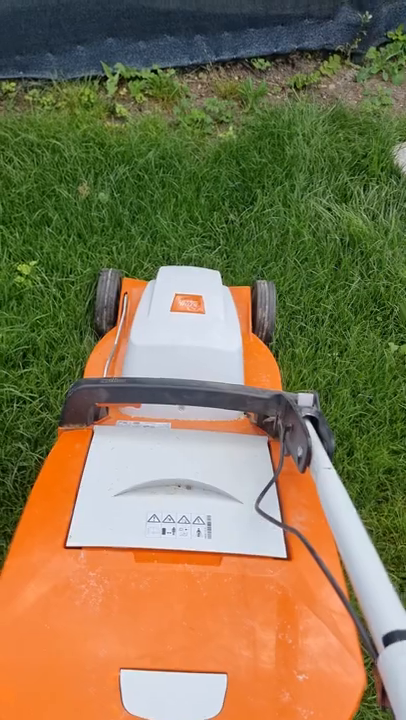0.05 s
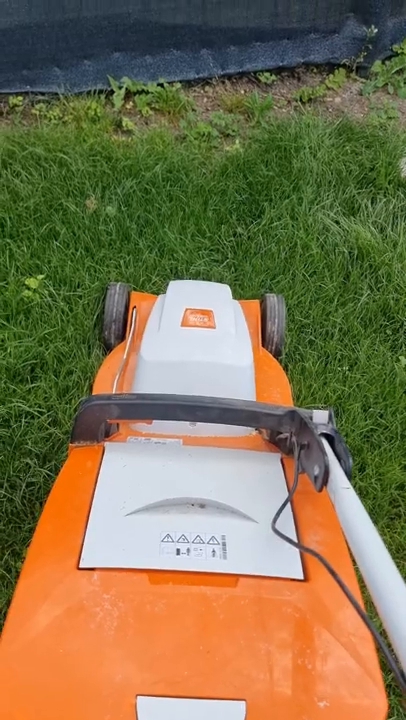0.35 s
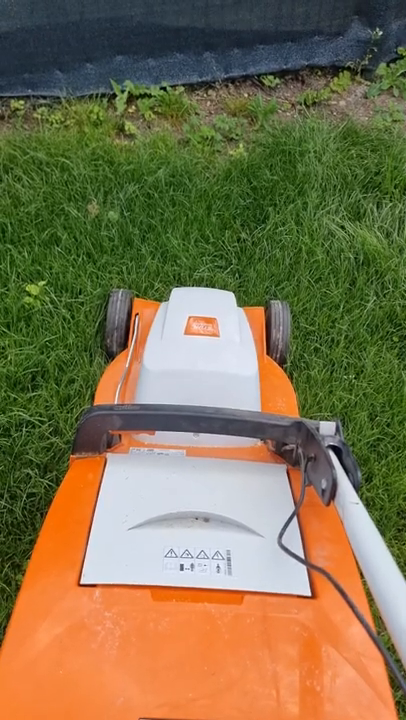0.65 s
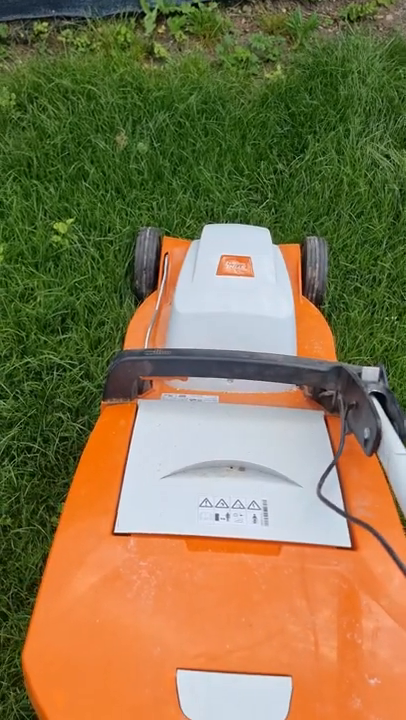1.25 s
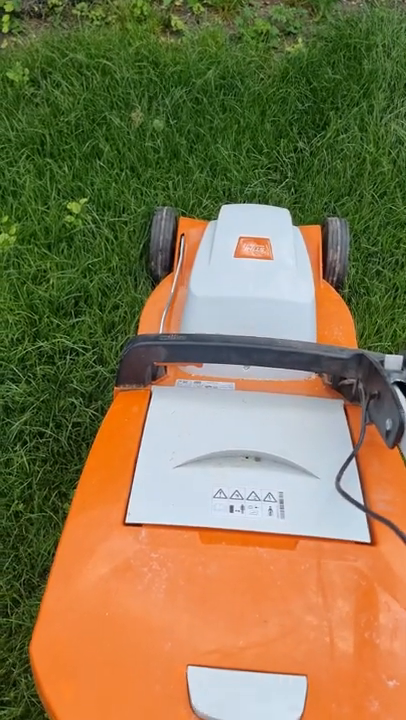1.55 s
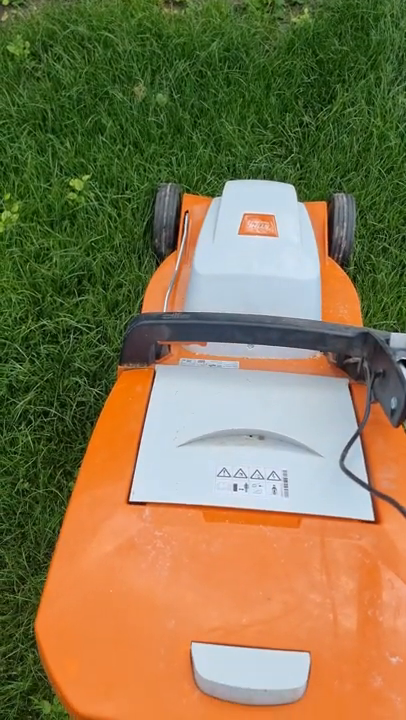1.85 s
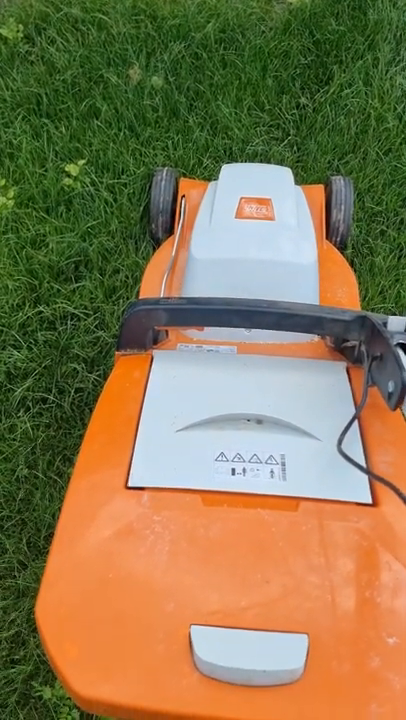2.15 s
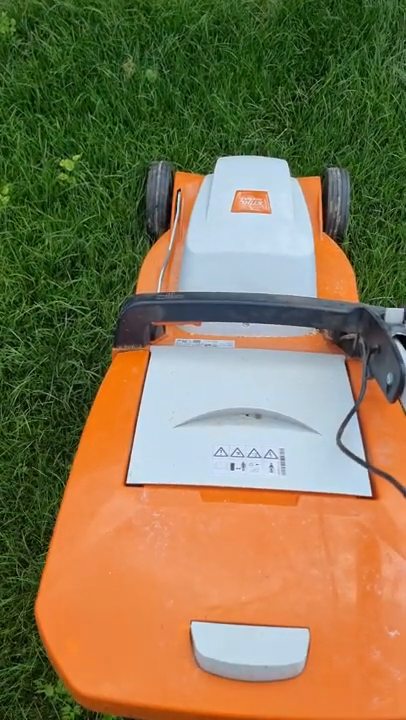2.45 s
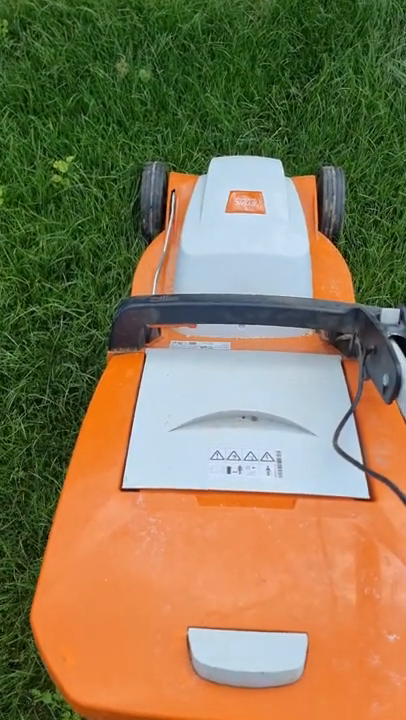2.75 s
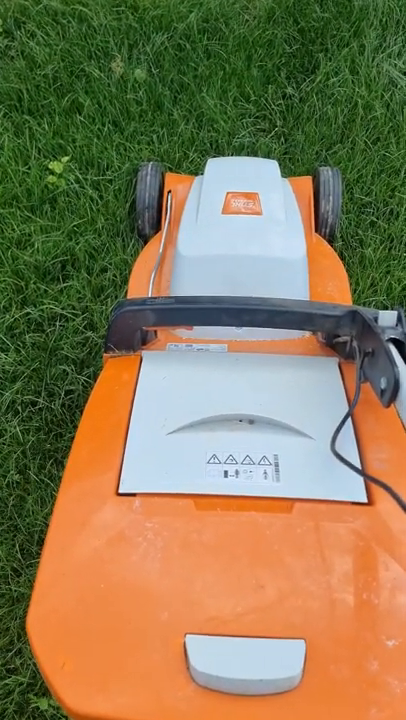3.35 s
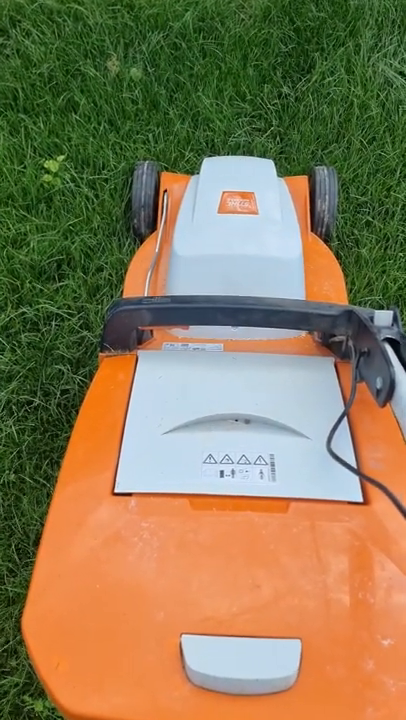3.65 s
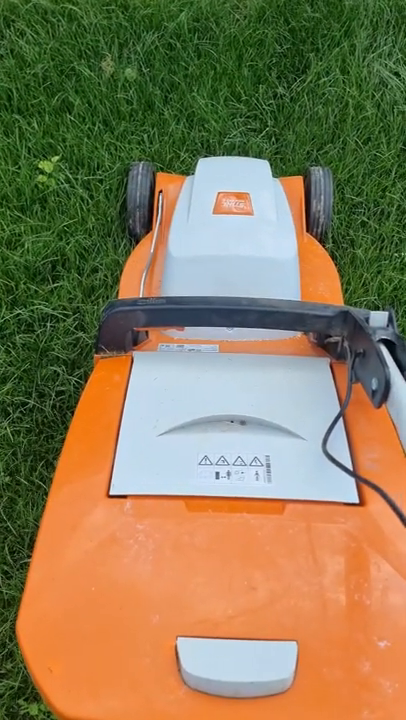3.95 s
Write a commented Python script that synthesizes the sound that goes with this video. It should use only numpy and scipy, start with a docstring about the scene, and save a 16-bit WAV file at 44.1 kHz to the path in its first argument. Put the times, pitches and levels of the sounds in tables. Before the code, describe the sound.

Heard from the handle outdoors, an electric lawn mower is switched on with a soft clack and a sharp snap. The motor jolts, clatters and rises in pitch, settling into a steady whirring hum with a fast rattle.

```python
"""An electric lawn mower is switched on, heard from its handle on a quiet lawn.
Hands rustle on the handle, a button clacks and the switch snaps. The motor jolts the plastic deck
(the shell over the blade) and clatters up to speed. Then the blade hums and churns the air,
the drive knocks and rattles in every turn, and the motor adds thin whistles."""
import sys
import numpy as np
from scipy import signal
from scipy.fft import rfft, irfft
from scipy.io import wavfile
from scipy.ndimage import uniform_filter1d, minimum_filter1d

SR = 44100
rng = np.random.default_rng(int(sys.argv[2]) if len(sys.argv) > 2 else 0)


def wav_record(signal):
    """Record a signal, one row per channel, as 16-bit PCM in the file named by sys.argv[1]."""
    frames = np.transpose(np.atleast_2d(signal))
    bounded = np.clip(frames, -1, 1)
    # unit amplitude maps onto the largest positive 16-bit level
    quanta = np.round(bounded * 32767).astype(np.int16)
    wavfile.write(sys.argv[1], SR, quanta)


N = 176400
T = np.arange(N) / SR

# How fast the motor shaft spins: time_s, turns_per_s
SHAFT_SPEED = [(1.211, 16.37), (1.28, 18.43), (1.37, 28.0), (1.5, 34.17), (1.62, 38.95), (1.75, 40.72),
               (1.87, 42.13), (2.0, 43.76), (2.25, 45.64), (2.6, 46.97), (3.05, 48.0), (3.5, 48.52),
               (4.0, 48.86)]
# How strongly the air in the deck rings at each pitch: pitch_hz, level_db
DECK_TONE = [(20, -25), (60, -17.5), (110, -18), (180, -4), (230, -8.5), (300, 1), (360, -1.5), (450, -10),
             (680, -9.5), (850, -9), (1300, -13), (2000, -19), (4000, -70.5)]


def amp(db):
    """Turns decibels into a gain."""
    return 10 ** (np.asarray(db) / 20)


def unit(x):
    """Scales a signal to an average strength (rms) of 1."""
    return x / np.sqrt(np.mean(x ** 2) + 1e-20)


def read(points, hz):
    """Looks up a pitch in a table, on a scale of octaves."""
    pitches, values = np.transpose(points)
    return np.interp(np.log(hz + 1), np.log(pitches + 1), values)


def level(points):
    """Turns a loudness curve into a gain, silent before it begins."""
    times, db = np.transpose(points)
    return amp(np.interp(T, times, db)) * (T >= times[0])


def add(mix, start_s, sound):
    """Mixes a stereo sound in at its start time."""
    part = mix[:, round(start_s * SR):][:, :sound.shape[1]]
    part += sound[:, :part.shape[1]]


def drift(hz):
    """A random wobble of strength 1, up to about the given rate."""
    keep_slow = 1 / (1 + (np.fft.rfftfreq(N, 1 / SR) / hz) ** 4)
    return unit(irfft(rfft(rng.standard_normal(N)) * keep_slow, N))


def colour(x, tone, size=4096):
    """Gives a sound a tone, with a filter that rings only after each hit."""
    log_gain = np.log(unit(amp(read(tone, abs(np.fft.fftfreq(size, 1 / SR))))))
    taps = np.fft.ifft(np.exp(np.conj(signal.hilbert(log_gain)))).real
    return signal.oaconvolve(x, taps[None, :size // 2], axes=1)[:, :x.shape[1]]


def noise(size):
    """White noise at two microphones, alike in the bass."""
    # How alike left and right are: pitch_hz, likeness (1 = the same)
    likeness = [(30, .92), (100, 1), (380, .98), (500, .65), (1050, .88), (2000, .5), (9000, 0)]
    left, other = np.exp(2j * np.pi * rng.random((2, size // 2 + 1)))
    same = np.clip(read(likeness, np.fft.rfftfreq(size, 1 / SR)), -1, 1)
    right = same * left + np.sqrt(1 - same ** 2) * other
    return unit(irfft(np.array([left, right]), size))


def decay(t, ring_s):
    """A fade that falls 60 dB in ring_s."""
    return np.exp(-np.log(1000) * t / ring_s)


def rubs(rows, tone, grain_db=2.0):
    """Soft, grainy rubbing that swells and fades with each stroke."""
    strokes = sum(amp(db) * np.sqrt(abs(np.sin(np.pi * np.clip((T - start_s) / length_s, 0, 1))))
                  for start_s, length_s, db in rows)
    grains = noise(N) * amp(grain_db * drift(hz=60))
    return unit(colour(grains, tone)) * strokes


def hits(rows, tone, size=8192):
    """Blows on plastic: quickly dying bursts of noise that share one tone."""
    out = np.zeros((2, N))
    for start_s, db, ring_s in rows:
        add(out, start_s, amp(db) * decay(T[:size], ring_s) * noise(size))
    return colour(out, tone)


def outdoor_air(start_s=0.068, level_db=-55):
    """Faint outdoor air that wavers a little."""
    # Tone of the air: pitch_hz, level_db
    tone = [(20, -14), (64, -3), (139, -11.5), (230, -12), (555, -21.5), (800, -11.5), (1590, -26.5),
            (3500, -34.5), (6720, -41), (8400, -56), (15000, -54)]
    return amp(level_db + drift(hz=6)) * unit(colour(noise(N), tone)) * (T > start_s)


def hands_and_sleeves():
    """A hand slides along the handle, and sleeves rustle."""
    # Strokes of hand and sleeves: start_s, length_s, level_db
    slides = [(.068, .55, -72.5)]
    rustles = [(.2, 0.37, -73), (.53, 0.26, -68.5), (.8, 0.45, -71)]
    # Their tones: pitch_hz, level_db
    slide_tone = [(2200, -16), (2850, 2), (3400, -18), (4400, -9), (6000, -30)]
    rustle_tone = [(2800, -20), (4800, 3), (7200, 2), (8400, -13), (14000, -6)]
    return rubs(slides, slide_tone) + rubs(rustles, rustle_tone)


def deck_jolts(rise_s=0.0038):
    """A nudge of the handle, then the twist of the starting motor, makes the deck boom."""
    # Jolts: start_s, level_db
    jolts = [(0.48, -50.5), (1.196, -30), (1.21, -15), (1.28, -19), (1.327, -14.5), (1.362, -16),
             (1.398, -14.5)]
    # The deck's own low notes: pitch_hz, level_db, ring_s
    notes = [(126, -16.5, 0.26), (200, 1.5, 0.078), (295.4, 4, 0.11), (311, 3, 0.1), (385.2, 2.5, 0.18),
             (537, -2.5, 0.08), (740, 8, 0.045)]
    out, t = np.zeros((2, N)), T[:SR // 2]
    ring = sum(amp(db) * decay(t, ring_s) * np.sin(2 * np.pi * hz * t) for hz, db, ring_s in notes)
    boom = np.minimum(t / rise_s, 1) * ring
    for start_s, db in jolts:
        add(out, start_s, np.tile(amp(db) * boom, (2, 1)))
    return out


def handle_clacks():
    """The handle and its button clack."""
    # Clacks: start_s, level_db, ring_s
    clacks = [(.576, -35, 0.11), (1.109, -44, 0.056)]
    # Their tone: pitch_hz, level_db
    tone = [(100, -9), (480, 5), (800, 12), (1300, 2), (1800, -4), (2400, -11), (3300, -30), (7000, -33),
            (10000, -42)]
    return hits(clacks, tone)


def switch_snap():
    """The switch closes with one bright snap."""
    # The snap: start_s, level_db, ring_s
    snap = (1.1832, -24, .04)
    # Its tone: pitch_hz, level_db
    tone = [(180, -48), (300, -10), (1440, -18), (1850, 1), (2480, -7), (3980, -10), (6100, -3.5),
            (7060, -5), (8190, -30), (11400, -21), (15000, -36)]
    return hits([snap], tone)


def starting_clatter():
    """The motor clatters heavily through its first turns."""
    # Clatters: start_s, level_db, ring_s
    clatters = [(1.19, -34.5, 0.33), (1.211, -16, 0.1), (1.268, -9.5, 0.071), (1.283, -10.5, 0.098),
                (1.318, -9.5, 0.16), (1.359, -13.5, 0.18), (1.394, -13.5, 0.1), (1.427, -16.5, 0.088),
                (1.458, -16, 0.034)]
    # Their tone: pitch_hz, level_db
    tone = [(150, -15), (350, -4), (800, 11), (1700, 0.5), (2800, -1), (3900, -5.5), (5000, -13.5),
            (6800, -24), (8500, -41), (16000, -28)]
    return hits(clatters, tone)


def even_ring(fade, passes=6):
    """A dense ring that follows the fade and favours no pitch."""
    ring = noise(len(fade))
    for _ in range(passes):
        ring = irfft(np.exp(1j * np.angle(rfft(ring * fade))))  # even across pitch
        ring = ring / np.sqrt(abs(uniform_filter1d(ring ** 2, size=24)) + 1e-18)  # even across time
    return unit(ring * fade)


def strikes(turns, rows, tone, loudness, rise_s=0.00091, jitter_s=1e-5, settle_s=0.22, size=2048):
    """Strikes ring the housing in every turn: loose and noisy at first, then nearly alike."""
    steady, energy = np.zeros((2, N)), np.zeros(N)
    running = turns > 0
    for place, db, ring_s in rows:
        due_turns = np.arange(int(turns[-1])) + place
        late_s = jitter_s * rng.standard_normal(len(due_turns))
        at_sample = (np.interp(due_turns, turns[running], T[running]) + late_s) * SR
        # Spread each pulse over its neighbours so it can land between samples.
        near = np.clip(at_sample.astype(int)[:, None] + np.arange(-8, 9), 0, N - 1)
        pulses = np.zeros(N)
        np.add.at(pulses, near, amp(db) * np.sinc(near - at_sample[:, None]))
        fade = unit(decay(T[:size], ring_s) * np.minimum(T[:size] / rise_s, 1))
        steady += signal.oaconvolve(pulses[None], even_ring(fade), axes=1)[:, :N]
        energy += signal.oaconvolve(pulses ** 2, fade ** 2)[:N]
    running_s = np.maximum(T - SHAFT_SPEED[0][0], 0)
    looseness = np.clip(0.033 + np.exp(-running_s / settle_s), 0, 1)
    blend = np.sqrt(1 - looseness ** 2) * steady + looseness * np.sqrt(abs(energy)) * noise(N)
    return unit(colour(blend, tone)) * np.sqrt(running.mean()) * level(loudness)


def drive(turns):
    """A crisp knock in every turn, a rattle after it, and chatter loudest as the motor pulls hardest."""
    # Strikes within one turn: place_turns, level_db, ring_s
    knocks = [(-.04, -8, 0.015), (-0.005, -9, 0.016)]
    rattles = [(0.169, -0.96, 0.02), (0.301, -0.5, 0.0259), (0.499, -1.5, .04)]
    chatter = [(-.025, -1.5, 0.0236), (0.059, -4, 0.031), (0.499, -6, .035)]
    # Tones of the struck housing: pitch_hz, level_db
    knock_tone = [(300, -43), (700, -12), (1100, -2.5), (1750, -10.5), (2100, 5.5), (2550, 0), (2950, -7.5),
                  (3200, 5.5), (3450, 5), (3650, -18), (4300, -2), (5000, -22), (6800, -13), (8000, -31),
                  (16000, -40)]
    rattle_tone = [(250, -19), (500, 5), (800, 0.5), (1100, -1), (1350, 0), (1800, 2.5), (2050, 1),
                   (2300, 3.5), (2600, -7), (3000, -15.5), (3300, 1.5), (3700, -5.5), (5000, -10.5),
                   (6700, -10), (8200, -27.5), (16000, -27)]
    chatter_tone = [(400, -18), (900, 0.5), (1400, -4.5), (1900, -38.5), (2250, 6.5), (2500, -15),
                    (2800, 7.5), (3100, -12.5), (3750, -6.5), (4200, -17.5), (7000, -21.5), (9000, -53.5)]
    # Loudness curves: time_s, level_db
    knock_loudness = [(1.21, -38), (1.27, -27), (1.47, -36), (1.801, -25), (2.2, -28.5), (2.7, -26.5),
                      (3.2, -24), (4.0, -24)]
    rattle_loudness = [(1.3, -23), (1.6, -24.5), (2.0, -23.5), (2.6, -23), (3.2, -22.5), (4.0, -24)]
    chatter_loudness = [(1.35, -26), (1.55, -18.5), (1.85, -18), (2.15, -23.5), (2.501, -26.5), (3.0, -28)]
    return (strikes(turns, knocks, knock_tone, knock_loudness)
            + strikes(turns, rattles, rattle_tone, rattle_loudness)
            + strikes(turns, chatter, chatter_tone, chatter_loudness))


def blade_air(turns, roar_depth=0.33, hiss_depth=0.037, waver_db=1.06):
    """Air churned in the deck throbs with each blade end; the hiss of the tips throbs once a turn."""
    # Loudness curves: time_s, level_db
    roar_loudness = [(1.22, -23), (1.28, -21), (1.38, -15), (1.47, -16), (1.75, -18), (2.2, -19),
                     (2.7, -19), (3.2, -21), (4.0, -22.5)]
    hiss_loudness = [(1.22, -38.5), (1.29, -32.5), (1.38, -28), (1.48, -30.5), (1.85, -30.5), (2.2, -27.5),
                     (3.0, -28.5), (4.0, -31)]
    # Tone of the blade tips: pitch_hz, level_db
    hiss_tone = [(300, -2), (1000, -4.5), (1800, -11), (2500, 5.5), (3600, 2), (4600, -1.5), (6800, -2),
                 (8000, -13), (11000, -16), (13000, -12), (16000, -22)]
    roar = colour(noise(N) * (1 + roar_depth * np.cos(4 * np.pi * turns)), DECK_TONE)
    hiss = colour(noise(N) * (1 + hiss_depth * np.cos(2 * np.pi * (turns - .2))), hiss_tone)
    waver = amp(waver_db * drift(hz=6.5))
    return unit(roar) * level(roar_loudness) + unit(hiss) * level(hiss_loudness) * waver


def blade_hum(speed, turns, lag_turns=0.0566, scatter=0.2423, roughness=0.005):
    """Tones at multiples of the shaft speed; the upper ones swell where the deck rings."""
    # Tones of the hum: multiple, level_db
    tones = [(1, -27), (2, 0.5), (3, -10.5), (4, 0.5), (5, -17), (6, -7), (7, -10), (8, -4.5), (9, -18.5),
             (10, -13), (11, -11), (12, -15), (13, -16.5), (14, -6.5), (15, -7), (16, -15.5), (17, -14.5),
             (19, -14.5), (20, -14.5), (21, -11.5), (22, -13), (23, -12), (24, -13.5), (25, -18.5)]
    # Loudness curve: time_s, level_db
    loudness = [(1.25, -61), (1.4, -27.5), (1.55, -19.5), (1.75, -16), (2.0, -13.5), (2.4, -13.5),
                (3.0, -12), (4.0, -13.5)]
    # Swell of the octave above the blade's main note: time_s, change_db
    octave_swell = [(1.4, -4.5), (1.75, 2.5), (2.1, 0.5), (2.62, -6), (3.0, -4.5), (3.7, -3)]
    out = np.zeros(N)
    for multiple, db in tones:
        phase = 2 * np.pi * multiple * (turns - lag_turns) + scatter * multiple * rng.standard_normal()
        phase += roughness * multiple * drift(hz=25.2)  # swirling air shakes the tone
        weight = min(multiple / 8, 1) ** 2  # low tones swell and waver less
        if multiple == 4:  # the main note is multiple 2, so this is its octave
            swell_db = np.interp(T, *np.transpose(octave_swell))
        else:
            deck_db = read(DECK_TONE, multiple * speed) - read(DECK_TONE, multiple * speed[-1])
            swell_db = 0.93 * weight * deck_db
        waver_db = 2.1 * weight * drift(hz=3.3)
        out += amp(db + swell_db + waver_db) * np.cos(phase)
    strength = np.sqrt(sum(amp(db) ** 2 for _, db in tones) / 2)
    return out / strength * level(loudness)


def motor_whistles(fade_s=0.063, flutter_db=10.0):
    """Thin whistles join as the motor nears full speed; the lower flutter, the highest come in bursts."""
    # Whistles: pitch_hz, width_hz, level_db, start_s, end_s, flutter_hz
    whistles = [(6650, 150, -45, 3.0, 3.88, 60), (13400, 200, -47.5, 2.88, 3.58, 35),
                (15315, 45, -50, 3.0, 4.1, 9), (15320, 160, -60, 1.6, 4.1, 9)]
    out, pitches = np.zeros((2, N)), np.fft.rfftfreq(N, 1 / SR)
    for hz, width_hz, db, start_s, end_s, flutter_hz in whistles:
        band = unit(irfft(rfft(noise(N)) / (1 + (2 * (pitches - hz) / width_hz) ** 2), N))
        flutter = amp(flutter_db * np.minimum(drift(hz=flutter_hz), 1))
        fade = np.clip(np.minimum(T - start_s, end_s - T) / fade_s, 0, 1)
        out += band * amp(db) * flutter * fade
    return out


def limiter(x, size=256):
    """Turns the gain down smoothly around peaks that would pass full scale."""
    gain = minimum_filter1d(1 / np.maximum(abs(x), 1), size, axis=1)
    return x * uniform_filter1d(gain, size, axis=1)


def scene():
    """Hands and clicks come first; then one shaft speed sets the pace of knock, air and hum."""
    speed = np.interp(T, *np.transpose(SHAFT_SPEED), left=0)
    turns = np.cumsum(speed) / SR
    handling = hands_and_sleeves() + handle_clacks()
    start = deck_jolts() + switch_snap() + starting_clatter()
    air = outdoor_air()
    blade = blade_hum(speed, turns) + blade_air(turns)
    return air + handling + start + blade + drive(turns) + motor_whistles()


def record(dry, top_hz=15800):
    """The left microphone hears earlier and in another tone; peaks are tamed, the top treble is cut."""
    # How much louder the left is than the right: pitch_hz, level_db
    balance = [(50, -3.5), (100, -1.5), (190, -1.5), (290, -3.5), (440, -9), (570, -8.5), (680, -3),
               (1080, 2.5), (1350, -1.5), (1600, 3), (2300, -3), (3400, 3.5), (4300, -3), (7000, 3.5),
               (14000, -1.5)]
    # How far the left is ahead: pitch_hz, phase_radians
    left_lead = [(420, 0), (560, 2), (1050, 2.5), (1400, 1.8), (2300, 6), (4200, 9.4)]
    pitches = np.fft.rfftfreq(2 * N, 1 / SR)
    lean = amp(read(balance, pitches) / 2)
    microphones = np.array([lean * np.exp(1j * read(left_lead, pitches)), 1 / lean])
    pair = limiter(irfft(rfft(dry, 2 * N) * microphones)[:, :N])
    treble_cut = signal.firwin(1023, top_hz, window=("kaiser", 9), fs=SR)
    return signal.oaconvolve(pair, treble_cut[None], "same")


dry = scene()
out = record(dry)
wav_record(out)
```